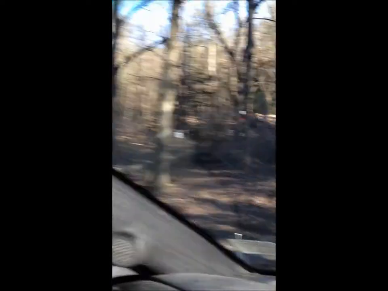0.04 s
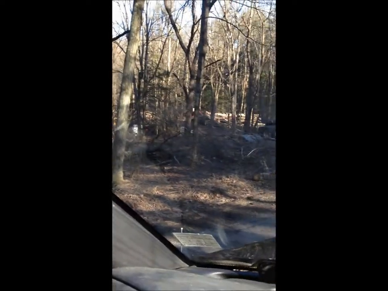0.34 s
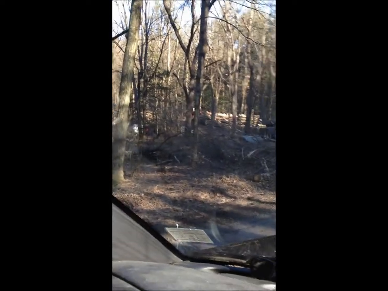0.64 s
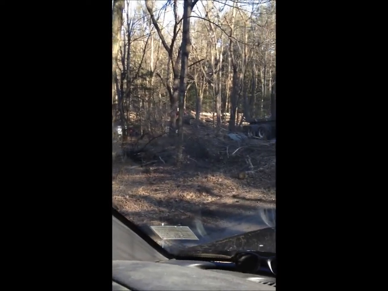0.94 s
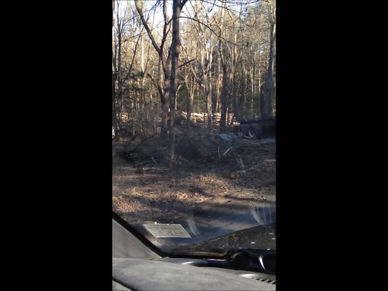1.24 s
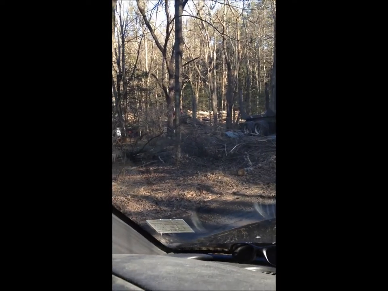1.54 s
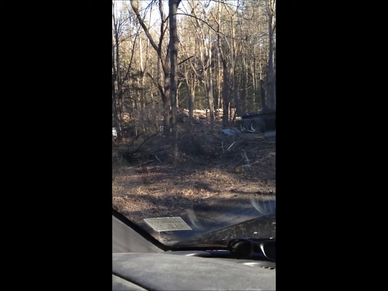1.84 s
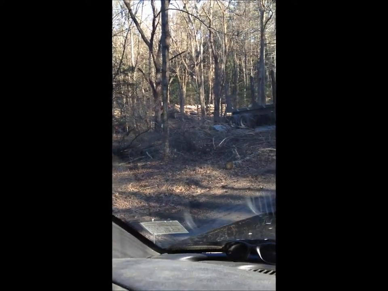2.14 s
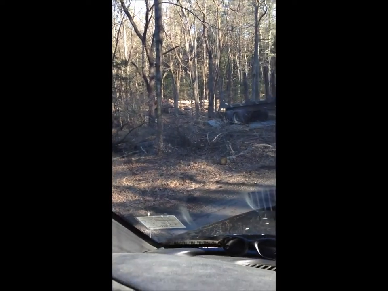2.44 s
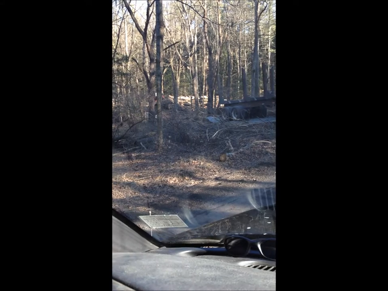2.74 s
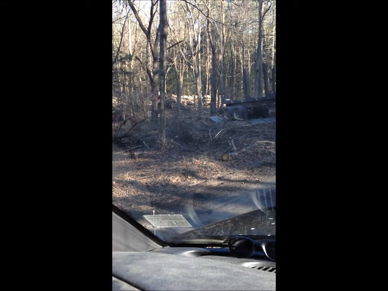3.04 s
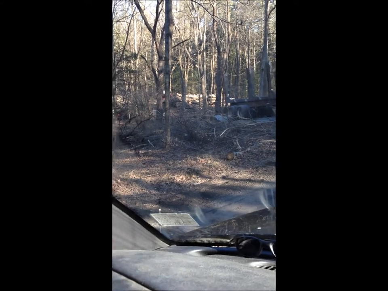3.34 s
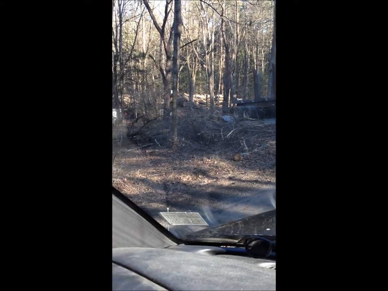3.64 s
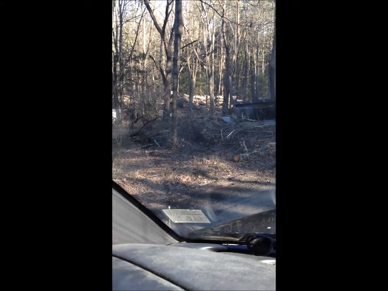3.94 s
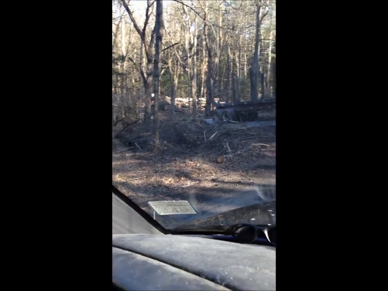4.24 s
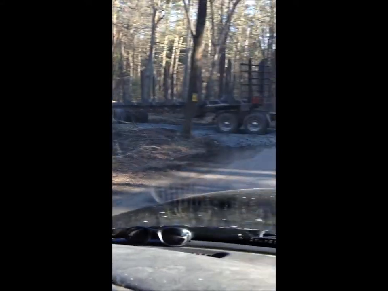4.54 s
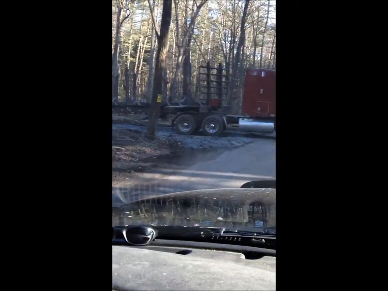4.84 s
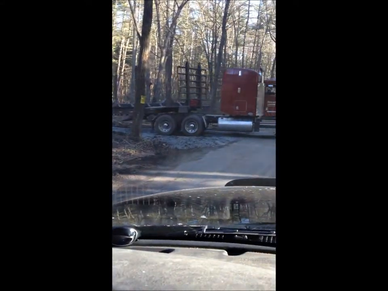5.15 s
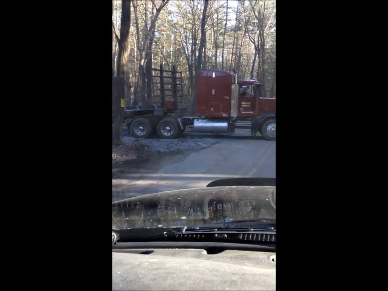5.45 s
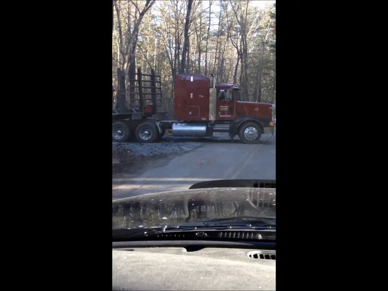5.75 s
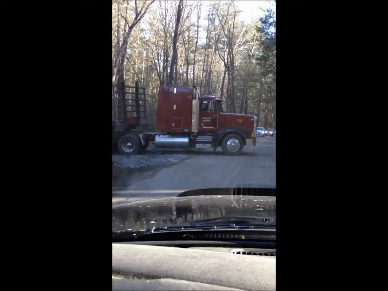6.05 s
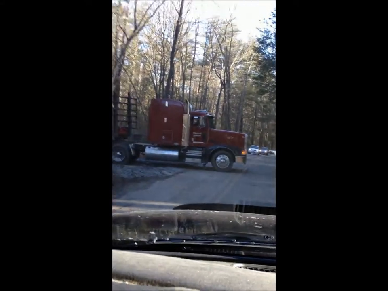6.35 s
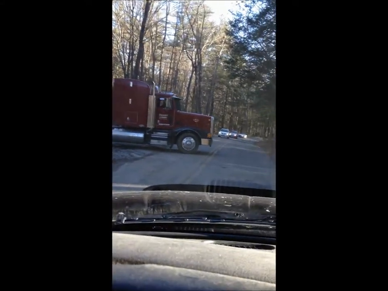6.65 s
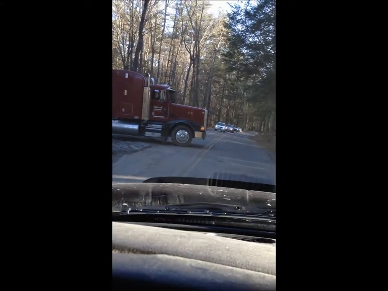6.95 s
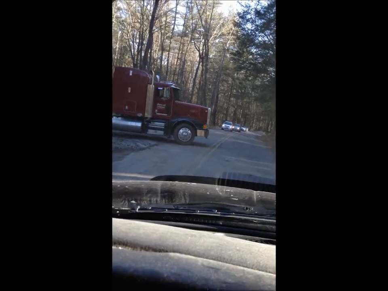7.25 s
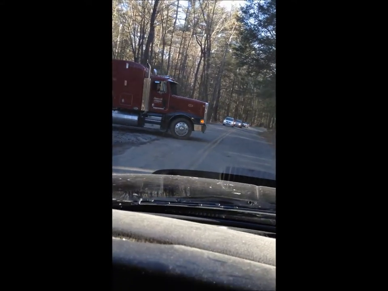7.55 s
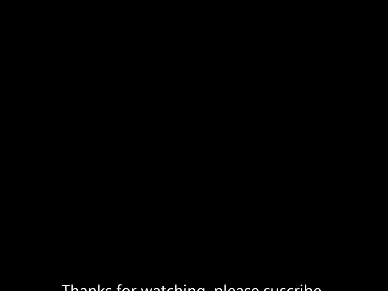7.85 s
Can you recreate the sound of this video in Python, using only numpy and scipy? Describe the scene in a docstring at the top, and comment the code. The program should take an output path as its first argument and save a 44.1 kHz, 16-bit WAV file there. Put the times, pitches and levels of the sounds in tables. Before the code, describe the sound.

A pickup engine idles steadily, heard from inside the closed cab as a low, throbbing hum with a dull churn and a faint belt whirr. Near the start, clothing rustles against the seat with a few light plastic taps, and softer rustles follow. Near the end come another rustle, two dull bumps and a sharp plastic click close to the microphone, and then the sound cuts off.

```python
"""Idling V8 pickup, from inside

A V8 idles at about 600 rpm in a standing pickup. Its uneven firings make the closed cab boom and
throb, and the engine bay adds a dull churn and a belt whirr. Someone shifts in the seat: clothes
rustle and plastic clicks. The sound is switched off just before the end."""
import sys
import numpy as np
from scipy import signal
from scipy.fft import rfft, irfft, next_fast_len
from scipy.io import wavfile
from scipy.ndimage import map_coordinates

SR = 44100
rng = np.random.default_rng(int(sys.argv[2]) if len(sys.argv) > 2 else 0)


def wav_record(signal):
    """Record a signal, one row per channel, as 16-bit PCM in the file named by sys.argv[1]."""
    frames = np.transpose(np.atleast_2d(signal))
    bounded = np.clip(frames, -1, 1)
    # unit amplitude maps onto the largest positive 16-bit level
    quanta = np.round(bounded * 32767).astype(np.int16)
    wavfile.write(sys.argv[1], SR, quanta)


N = 356989
TIME = np.arange(N) / SR


def amp(db):
    """Turn decibels into a gain."""
    return 10 ** (np.asarray(db) / 20)

def unit(x):
    """Scale to an average (rms) level of 1."""
    return x / np.sqrt(np.mean(x ** 2) + 1e-20)

def curves(rows):
    """Join timed points with lines, one curve for each column after the time."""
    times, *columns = np.transpose(rows)
    return [np.interp(TIME, times, column) for column in columns]

def wobble(rate):
    """A smooth curve through `rate` random points a second."""
    return map_coordinates(rng.standard_normal(int(N * rate / SR) + 4), [TIME * rate])

def swell(peak_s, rise, fall):
    """Grow to 1 at peak_s, then ease off."""
    t = TIME - peak_s
    return np.exp(-np.abs(t / np.where(t < 0, rise, fall)) ** 1.37)  # 1 is pointed, 2 is rounded

def filtered(x, response):
    """Scale each frequency in x by response(Hz)."""
    size = next_fast_len(N + SR)
    return irfft(rfft(x, size) * response(np.fft.rfftfreq(size, 1 / SR)), size)[:N]

def resonate(x, modes):
    """Let x ring at (Hz, width, dB) resonances of alternating sign."""
    return filtered(x, lambda f: sum((-1) ** k * amp(db) * 1j * f * w / (hz * hz - f * f + 1j * f * w)
                                     for k, (hz, w, db) in enumerate(modes)))

def colour(x, spectrum):
    """Shape x with a (Hz, dB) curve that falls away past its ends; the level comes out at 1."""
    hz, db = np.transpose(spectrum)
    skirt = lambda f: np.minimum(f / hz[0], 1) ** 2 * np.minimum(hz[-1] / (f + 1), 1) ** 2
    return unit(filtered(x, lambda f: skirt(f) * amp(np.interp(np.log(f + 1), np.log(hz), db))))

def noise(spectrum):
    """Coloured noise at level 1."""
    return colour(rng.standard_normal(N), spectrum)

def burst(start, fade_s):
    """Sudden noise that drops 60 dB in fade_s seconds."""
    t = TIME - start
    return (t >= 0) * amp(-60 * np.clip(t / fade_s, 0, 2)) * rng.standard_normal(N)

def touch(start, hz, width, fade_s):
    """A padded touch rings little but the panel's own note; its peak is 1."""
    panel = [(hz, width, 0)]
    ring = resonate(resonate(burst(start, fade_s), panel), panel)
    return ring / np.abs(ring).max()


# The eight cylinders in firing order. Each row: delay in seconds, relative strength in dB.
FIRING_ORDER = [(.01268, 0), (.00936, 4.1), (.00394, 1.8), (.00331, 4.2), (.00225, 2.6), (.00407, 7.1),
                (.00327, .6), (.0038, 6.3)]
# How the body panels and cab air ring. Each row: pitch in Hz, width in Hz, relative level in dB.
CAB_RING = [(41.4, 3.5, -6.6), (65, 3.5, 6.9), (78.8, 4.2, 3.4), (95.5, 6.5, 15.9), (106.5, 19.1, 20.3),
            (127, 4.9, 26.9)]
# How loud the boom is. Each row: time in seconds, level in dB.
BOOM_LEVEL = [(0, -35.5), (4.2, -35.7), (5.4, -36), (6.3, -34), (6.8, -34.7), (7.5, -36.2)]

def boom(firings, scatter_db=0.79, jitter_s=.0001, leak_hz=60, muffle_hz=380):
    """Each firing sends a pulse that rings the cab; the uneven pattern repeats five times a second."""
    number = np.arange(-2 * len(FIRING_ORDER), int(firings[-1]))  # the cab is ringing from the start
    delay, db = np.array(FIRING_ORDER)[number % len(FIRING_ORDER)].T
    jitter, scatter = rng.standard_normal((len(number), 2)).T
    due = np.interp(number, firings, np.arange(N)) + np.minimum(number, 0) * N / firings[-1]
    at = (due + SR * (delay + jitter_s * jitter)).astype(int)
    size = next_fast_len(N + SR)  # firings before time zero wrap round to the end
    pulses = np.bincount(at % size, amp(db + scatter_db * scatter), size)
    leak = lambda f: (1j * f / (leak_hz + 1j * f)) ** 2  # the deepest pressure escapes the cab
    muffle = lambda f: 1 / (1 + (f / muffle_hz) ** 4)  # the wall to the engine dulls sharp edges
    ring = filtered(resonate(pulses, CAB_RING), lambda f: leak(f) * muffle(f))
    return amp(curves(BOOM_LEVEL)[0]) * unit(ring)


# The idle's clean tones. Each row: multiple of the cycle rate, level in dB before the microphone turns.
OVERTONES = [(28, -65), (35, -67), (36, -64.5), (43, -64.5), (44, -57.5), (48, -65), (54, -67), (58, -68),
             (72, -67)]

def drone(cycle, turn, ahead_db=-2):
    """Clean overtones follow the engine's speed, a little softer when facing ahead."""
    return sum(amp(db + ahead_db * turn + 0.71 * wobble(3.8))
               * np.sqrt(2) * np.sin(2 * np.pi * (multiple * cycle + rng.random()))
               for multiple, db in OVERTONES)


# The thud in the wall between engine and cab. Each row: frequency in Hz, relative level in dB.
KNOCK_COLOUR = [(160, -4), (220, 3.5), (340, 2), (420, -8)]

def knock(cycle, beat, swell_db=3.5):
    """The same moving parts make the same noise every cycle, swelling at each firing."""
    length = int(N / cycle[-1])
    looped = rng.standard_normal(length)[(cycle % 1 * length).astype(int)]
    return amp(-59) * unit(amp(swell_db * beat) * colour(looped, KNOCK_COLOUR))


# The engine bay heard through that wall. Each row: frequency in Hz, relative level in dB.
CHURN_COLOUR = [(30, -28), (70, -7), (140, 2.5), (200, -0.5), (255, -1), (285, -2), (355, 1), (430, -7),
                (475, -1), (530, -0.5), (580, -10.5), (640, -6.5), (760, -18), (1000, -18.5), (1250, -29)]

def churn(cycle, beat, turn, ahead_db=-2.4):
    """Dull engine noise swells at each firing and once per turn of the crankshaft."""
    lope = np.cos(2 * np.pi * (2 * cycle - .72))
    return amp(-49.4 + ahead_db * turn + 0.4 * beat + 0.28 * lope + 0.68 * wobble(9)) * noise(CHURN_COLOUR)


# Valve and fan noise. Each row: frequency in Hz, relative level in dB.
CLATTER_COLOUR = [(500, -26), (900, 1.5), (1250, -3), (1600, 0), (1950, -1.5), (2300, -5), (3250, -7),
                  (3700, -10), (4500, -11), (7000, -21), (15000, -43)]

def clatter(beat):
    """The valves and fan make a brighter, almost steady noise."""
    return amp(-64 + .15 * beat + 0.37 * wobble(6.1)) * noise(CLATTER_COLOUR)


# How small parts ring. Each row: pitch in Hz, width in Hz, relative level in dB.
BRACKET_RING = [(790, 46, 2), (942, 30, -2), (1326, 55, -5.5), (2500, 46, -7.5), (3260, 82, -9.5)]

def buzz():
    """Small parts buzz along with the engine."""
    return amp(-71.5 + 1.2 * wobble(2.7)) * unit(resonate(rng.standard_normal(N), BRACKET_RING))


# The belt's two tones draw together late on. Each row: time in seconds, gap in Hz, level in dB.
BELT_TONES = [(0, 29.8, -67.5), (3.4, 33, -70), (4.4, 33.4, -65.8), (5.8, 31.7, -65.8), (6.7, 24, -65),
              (7.5, 12.7, -65.5)]

def belt(cycle, centre_hz=1105.6, waver_hz=5.5, warble_hz=7.5, fuzz=0.42):
    """Two close tones warble once a cycle, and waver and fade as the belt slips, in a thin noise."""
    gap_hz, level_db = curves(BELT_TONES)
    pitch = centre_hz + waver_hz * wobble(9.9) + warble_hz * np.sin(2 * np.pi * cycle)
    tones = 0
    for side in (-1, 1):
        gain = amp(1.2 * wobble(6))
        hz = pitch + side * gap_hz / 2 + 3.5 * wobble(25)
        tones += gain * np.sin(2 * np.pi * np.cumsum(hz) / SR)
    band = unit(resonate(resonate(rng.standard_normal(N), [(1110, 110, 0)]), [(1104, 120, 0)]))
    return amp(level_db) * unit(tones + fuzz * band)


# The deepest noise. Each row: frequency in Hz, relative level in dB.
RUMBLE_COLOUR = [(15, -4.5), (35, -4), (60, -2)]

def rumble():
    """The truck's frame trembles."""
    return amp(-72.5) * noise(RUMBLE_COLOUR)


# The crankshaft's speed. Each row: time in seconds, turns a minute.
IDLE_SPEED = [(0, 602.2), (.8, 602.8), (1.35, 604.4), (1.8, 598.9), (2.4, 602.2), (3.2, 605.05),
              (3.9, 602.25), (4.6, 601.25), (5.2, 599.6), (5.75, 598), (6.3, 604.7), (6.9, 604.3),
              (7.5, 613.9)]
# The microphone swings round. Each row: time in seconds, turn from 0 (side window) to 1 (road ahead).
MIC_TURN = [(3.7, 0), (5.5, 0.43), (6.2, 1)]

def engine():
    """The crankshaft sets the pace; the balance of sounds shifts as the microphone turns."""
    rpm, = curves(IDLE_SPEED)
    turn, = curves(MIC_TURN)
    cycle = np.cumsum(rpm) / SR / 60 / 2  # cycles so far, two crankshaft turns each
    firings = cycle * len(FIRING_ORDER)
    beat = np.cos(2 * np.pi * (firings - .8))  # peaks once per firing
    return (boom(firings) + drone(cycle, turn) + knock(cycle, beat) + churn(cycle, beat, turn)
            + clatter(beat) + buzz() + belt(cycle) + rumble())


# The microphone's hiss. Each row: frequency in Hz, relative level in dB.
HISS_COLOUR = [(1500, -20.5), (4000, -2.5), (7500, 4.5), (10000, -1), (13500, 3.5), (15500, 2.5)]
# Thin electronic tones. Each row: pitch in Hz, level in dB.
WHINES = [(13955, -86), (14917, -86)]

def electronics(waver_db=3.5):
    """The microphone hisses, and two faint whines waver in loudness."""
    whine = sum(amp(db + waver_db * wobble(1.5)) * np.sin(2 * np.pi * hz * TIME) for hz, db in WHINES)
    return amp(-70) * noise(HISS_COLOUR) + whine


# Cloth rubbing coarsely, and sliding smoothly. Each row: frequency in Hz, relative level in dB.
RUB_COLOUR = [(200, -9), (500, -2), (1100, 0.5), (1700, -0.5), (3000, -6.5), (5500, -13.5), (10000, -24.5),
              (15500, -27)]
SLIDE_COLOUR = [(1500, -25.5), (4000, -1.5), (7000, 0.5), (10000, 0.5), (13500, -0.5), (15500, -2)]
# A sleeve strokes the seat. Each row: fastest moment, rise and fall in seconds, rub and slide in dB.
SLEEVE_STROKES = [(.04, 0.089, 0.17, -61.5, -90), (.54, 0.28, 0.28, -54, -61.5),
                  (1.97, 0.45, 0.47, -62, -70), (2.68, 0.15, 0.47, -68, -69),
                  (4.28, 0.086, 0.033, -65, -69.5), (6.39, 0.17, 0.098, -74, -72),
                  (6.68, 0.11, 0.03, -69, -58.5), (7.05, 0.24, 0.16, -62, -63.5)]

def clothes(grain_db=1.5, snags_per_s=180, crackle_db=-9):
    """Fibres catch and slip: each stroke is a crackling rub and a smooth hiss, louder when faster."""
    rub_gain = sum(amp(db) * swell(s, rise, fall) for s, rise, fall, db, _ in SLEEVE_STROKES)
    slide_gain = sum(amp(db) * swell(s, rise, fall) for s, rise, fall, _, db in SLEEVE_STROKES)
    snags = (rng.random(N) < snags_per_s / SR) * rng.uniform(-1.1, 1, N)
    tick = burst(0, 0.01)[:SR // 100]
    crackle = colour(signal.fftconvolve(snags, tick)[:N], RUB_COLOUR)
    rub = unit(amp(grain_db * wobble(120)) * noise(RUB_COLOUR) + amp(crackle_db) * crackle)
    slide = amp(0.78 * wobble(65)) * noise(SLIDE_COLOUR)
    return rub_gain * rub + slide_gain * slide


# Light taps, the last one the body of the catch's snap. Each row: start in seconds, peak in dB, pitch in Hz,
# width in Hz, fade in seconds.
TRIM_TAPS = [(0.023, -46, 1800, 900, 0.01), (0.0648, -43.5, 8500, 1700, 0.008),
             (.486, -41.5, 1600, 1900, .03), (0.556, -42.5, 2300, 1800, 0.035),
             (.584, -46, 3500, 2000, .012), (.640, -41, 1510, 800, 0.062), (.646, -36, 1750, 1300, 0.04),
             (0.743, -49, 2600, 2100, 0.02), (.782, -51, 2100, 1600, .02), (6.357, -47, 1150, 600, 0.053),
             (7.029, -40, 680, 400, .07), (7.035, -47, 2050, 699, .05), (7.047, -42, 500, 220, 0.05),
             (7.178, -42, 1150, 1700, 0.031)]

def taps():
    """Small touches briefly ring the cab's trim; the last gives the catch's snap its body."""
    return sum(amp(db) * touch(start, hz, width, fade_s) for start, db, hz, width, fade_s in TRIM_TAPS)


# How nylon rings. Each row: pitch in Hz, width in Hz, relative level in dB.
NYLON_RING = [(6550, 205, 2), (8500, 150, -3), (10400, 250, -2.5), (12600, 260, -2), (13530, 450, 4)]
# Squeaks. Each row: loudest moment, rise and fall in seconds, level in dB, pitch and width in Hz.
NYLON_SQUEAKS = [(2.62, .05, 0.29, -68, 11000, 16000), (3.05, .2, 0.24, -79, 8420, 500)]

def squeaks():
    """Nylon sings faintly during a stroke, first at all its pitches, then mainly at one."""
    ring = resonate(rng.standard_normal(N), NYLON_RING)
    return sum(amp(db) * swell(s, rise, fall) * unit(resonate(ring, [(hz, width, 0)]))
               for s, rise, fall, db, hz, width in NYLON_SQUEAKS)


# A hollow note. Its one row: pitch in Hz, width in Hz, relative level in dB.
HOLLOW_RING = [(526, 45, 0)]

def hollow():
    """A hollow note swells out of the churn for a moment as the microphone turns."""
    ring = resonate(resonate(rng.standard_normal(N), HOLLOW_RING), HOLLOW_RING)
    return amp(-58.5) * swell(5.05, rise=0.36, fall=0.604) * unit(ring)


# A catch is touched, then snaps. Each row: start in seconds, peak in dB, width of the blow in Hz.
CATCH_BLOWS = [(7.035, -46, 200), (7.1767, -33.3, 6500)]
# How its plastic rings. Each row: pitch in Hz, width in Hz, relative level in dB.
PLASTIC_RING = [(3050, 1200, -3), (4500, 450, 1), (5200, 750, 0), (7630, 500, -11.5), (8900, 1500, -10),
                (12800, 1500, -8)]

def catch(centre_hz=4430, echo_db=-13):
    """Blows ring a plastic catch and the cab echoes briefly; the harder blow spans more pitches."""
    out = 0
    for start, db, width in CATCH_BLOWS:
        blow = burst(start, fade_s=.024) + amp(echo_db) * burst(start, fade_s=.075)
        snap = resonate(resonate(blow, [(centre_hz, width, 0)]), PLASTIC_RING)
        out += amp(db) * snap / np.abs(snap).max()
    return out


# Bumps against the seat. Each row: start in seconds, peak in dB.
SEAT_BUMPS = [(7.042, -35), (7.210, -34.5)]

def bumps():
    """The padded seat answers each bump with a dull thud."""
    return sum(amp(db) * touch(start, hz=250, width=180, fade_s=0.095) for start, db in SEAT_BUMPS)


def scene():
    """Everything meets at one microphone behind the windscreen."""
    return (engine() + electronics() + clothes() + taps() + squeaks() + hollow() + catch() + bumps())[None]

def record(dry):
    """The sound stops dead at the switch-off, and the very highest treble is cut away."""
    off_s, top_hz = 7.597, 15350
    return filtered(dry[0] * (TIME < off_s), lambda hz: hz < top_hz)[None]


dry = scene()
out = record(dry)
wav_record(out)
```